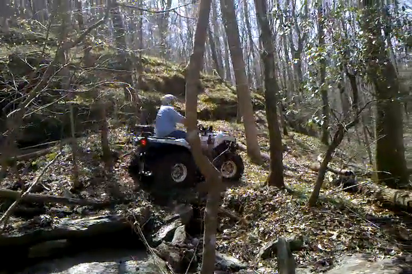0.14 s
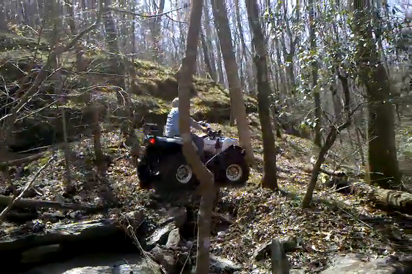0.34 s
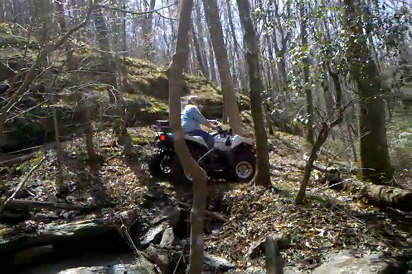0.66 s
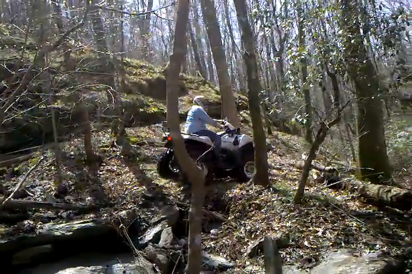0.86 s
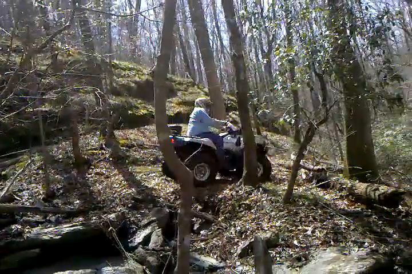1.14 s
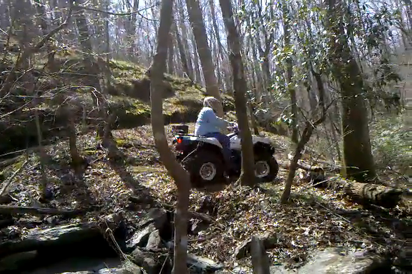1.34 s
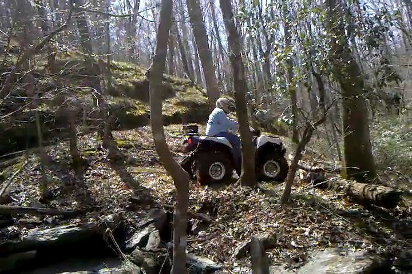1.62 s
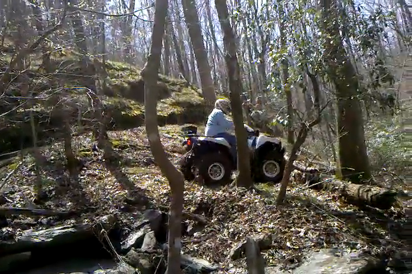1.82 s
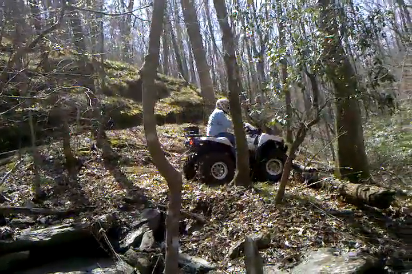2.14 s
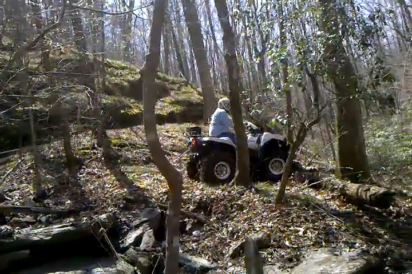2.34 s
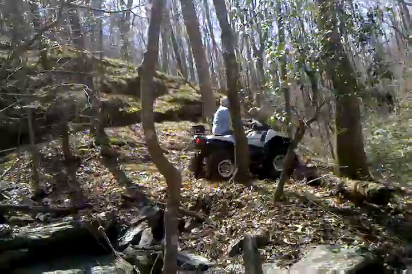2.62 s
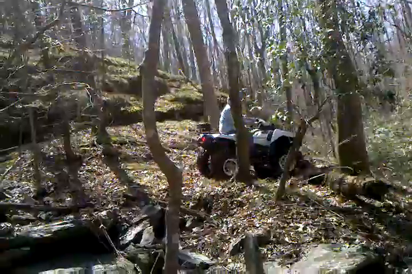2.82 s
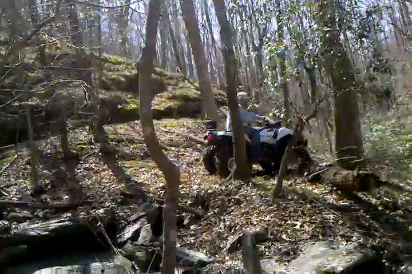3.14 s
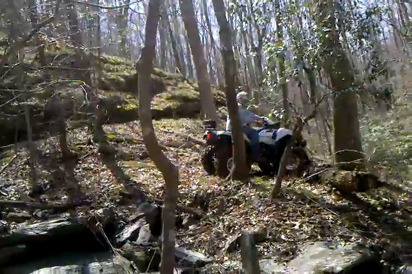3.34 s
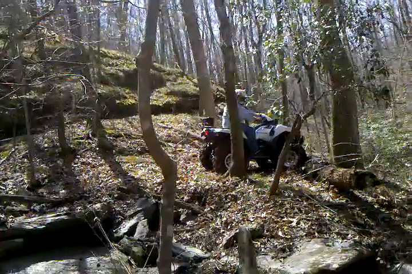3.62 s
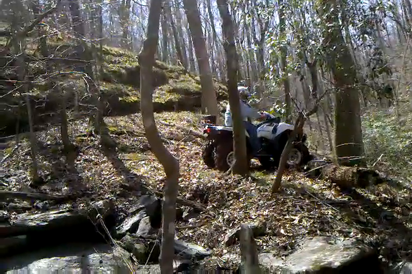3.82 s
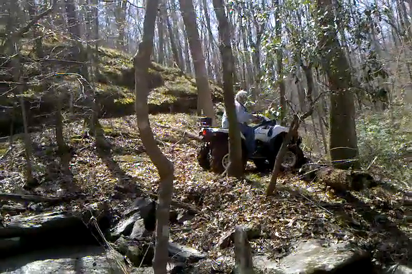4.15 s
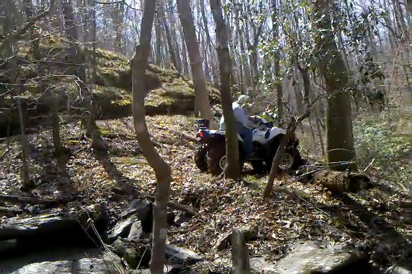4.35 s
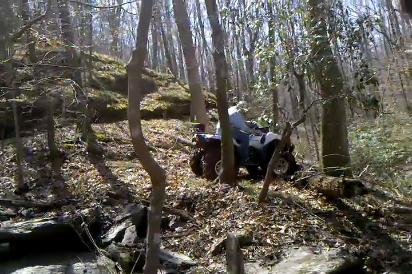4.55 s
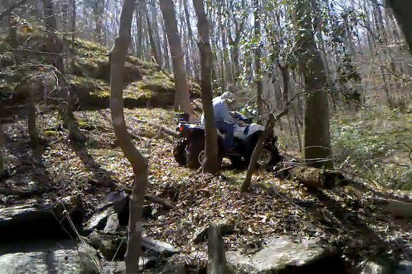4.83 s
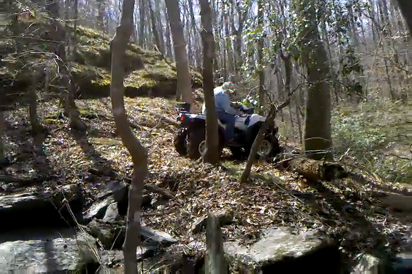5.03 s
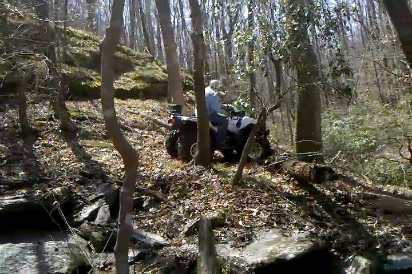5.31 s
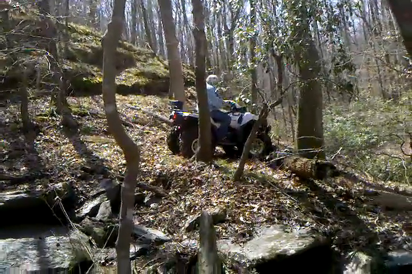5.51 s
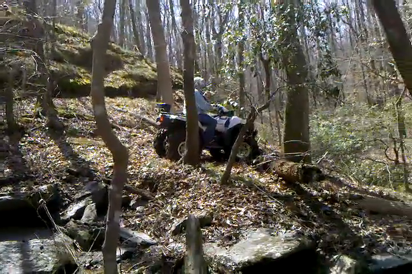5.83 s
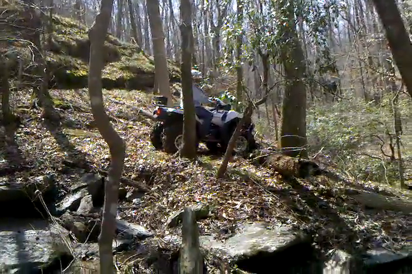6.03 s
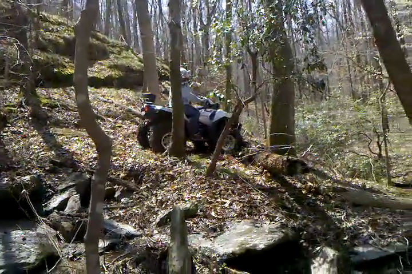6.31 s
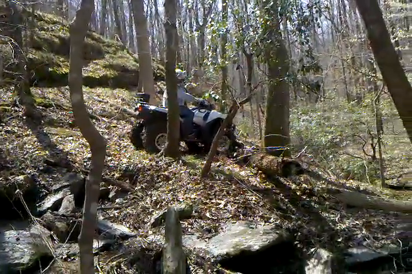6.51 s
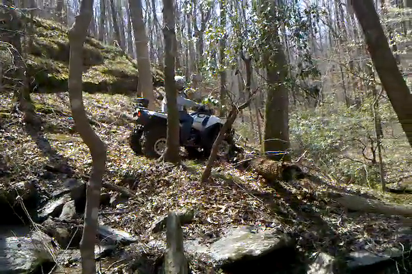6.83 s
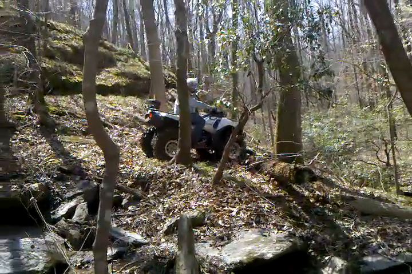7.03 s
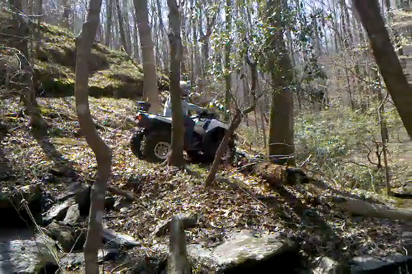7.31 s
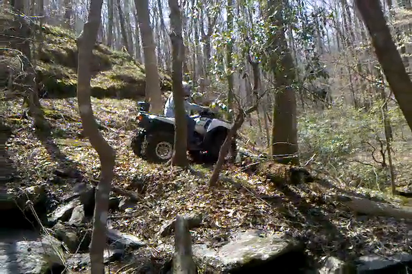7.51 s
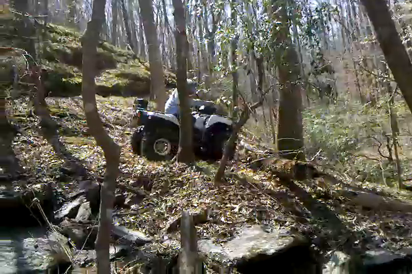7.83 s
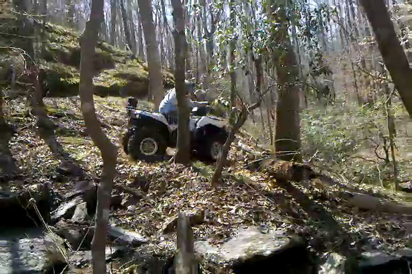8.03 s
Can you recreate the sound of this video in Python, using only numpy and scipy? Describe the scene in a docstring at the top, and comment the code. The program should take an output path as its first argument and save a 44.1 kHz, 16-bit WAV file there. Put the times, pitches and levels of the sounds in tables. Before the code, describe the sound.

Over the steady hiss of a small creek, a quad bike crawls at low speed with a booming putter, ticking valves and a whirring drive. It blips the throttle several times, idles while the gears clunk, and then revs more strongly as leaves crackle and swish beneath it. The trees add a short, light echo, and a small microphone some distance away dulls the highs.

```python
"""A single-cylinder quad bike crawls over rocks and dead leaves in a wood, some way from the microphone.
It putters in bursts of throttle, idles while the gears clunk, then revs up. Each firing booms in the
silencer and barks through the engine's metal and cavities; valves tick and the drive whirrs and whines.
Leaves swish and twigs snap under the tyres, and the trunks scatter the sound.
Behind it a small creek hisses over a faint low rumble. One small microphone, mono, with dull treble."""
import sys
import numpy as np
from scipy import signal
from scipy.fft import rfft, irfft, next_fast_len
from scipy.io import wavfile

SR = 44100
rng = np.random.default_rng(int(sys.argv[2]) if len(sys.argv) > 2 else 0)


def bounce(signal):
    """Save signal as a 16-bit WAV file at the path given by the first command-line argument."""
    frames = np.transpose(np.atleast_2d(signal))
    limited = np.clip(frames, -1, 1)
    pcm = np.round(limited * 32767).astype(np.int16)
    wavfile.write(sys.argv[1], SR, pcm)


N = 359856
TIME = np.arange(N) / SR
IDLE_PER_S, THROTTLE_PER_S = 11.499, 17.591  # firings at idle, and what full throttle adds

# silencer chambers, in series: f/Hz, width/Hz
SILENCER_CHAMBERS = [(150, 74.5), (181, 92)]
# rolling over the ground: t/s, clatter level at idle/dB, leaf level/dB (both relative)
ROLLING_LEVELS = [(0, -50, -56), (1.3, -52, -55.5), (2.0, -54, -56), (3.0, -51.5, -55), (3.6, -52.5, -52.5),
                  (4.0, -55, -59), (4.9, -52.5, -60.5), (5.4, -55, -54), (6.4, -53, -51.5),
                  (7.3, -52, -49.5), (7.8, -53, -55.5), (8.16, -49, -50)]


def from_db(db):
    """Decibels to gain."""
    return 10 ** (np.asarray(db) / 20)


def rms_one(x):
    """Scale to unit rms."""
    return x / np.sqrt(np.mean(x ** 2) + 1e-20)


def curve(rows):
    """Each column of a timed table, interpolated at every sample."""
    times, *columns = np.transpose(rows)
    return [np.interp(TIME, times, column) for column in columns]


def cut(x, hz, kind, order=2):
    """Butterworth filter."""
    return signal.sosfilt(signal.butter(order, hz, kind, fs=SR, output="sos"), x + 1e-18)


def resonator(hz, width_hz):
    """Filter coefficients of one resonance, gain 1 at its peak."""
    r = np.exp(-np.pi * width_hz / SR)
    return np.array([1, 0, -1]) * (1 - r * r) / 2, [1, -2 * r * np.cos(2 * np.pi * hz / SR), r * r]


def resonate(x, hz, width_hz):
    """Ring one fixed resonance."""
    return signal.lfilter(*resonator(hz, width_hz), x + 1e-18)


def colour(x, spectrum):
    """Give a steady sound a spectrum that falls away below its lowest point; rms 1."""
    hz, db = np.transpose(spectrum)
    size = next_fast_len(N)
    bins_hz = np.maximum(np.arange(size // 2 + 1) * SR / size, 1)
    gains = from_db(np.interp(np.log(bins_hz), np.log(hz), db))
    shaped = irfft(rfft(x, size) * gains, size)[:N]
    return rms_one(cut(shaped, hz[0], "high"))


def drift(per_s):
    """A random wander with a spread near 1."""
    knots = rng.standard_normal(4096)
    return np.interp(TIME * per_s, np.arange(len(knots)), knots)


def grains(per_s, spread_db):
    """Random clicks, mostly small and a few large; rms 1."""
    sizes = from_db(spread_db * np.minimum(rng.exponential(1, N), 4)) * rng.choice([-1, 1], N)
    return rms_one(sizes * (rng.random(N) < per_s / SR))


def clicks(times, sizes):
    """One click of the given size at each time."""
    at = np.round(times * SR).astype(int)
    inside = (at >= 0) & (at < N)
    return np.bincount(at[inside], sizes[inside], N)


def bursts(times, sizes, decay_s):
    """Noise that jumps up at each time and dies away."""
    envelope = signal.lfilter([1], [1, -np.exp(-1 / (decay_s * SR))], clicks(times, sizes) + 1e-18)
    return envelope * rng.standard_normal(N)


def lag(x, lag_s):
    """Follow a control with inertia, starting settled."""
    keep = np.exp(-1 / (lag_s * SR))
    return x[0] + signal.lfilter([1 - keep], [1, -keep], x - x[0])


def throttle(idle_puff_db=-28, charge_db=8, filling_opening=.19, idle_bark_db=-56, strain_db=6):
    """The intake fills and the flywheel follows; gives firings per s, puff level and bark level."""
    # presses of the thumb throttle: start t/s, end t/s, opening/0-1, relative bark level/dB
    presses = [(0, .015, .444, -45), (.084, .485, .131, -55), (.487, .787, .289, -47),
               (.793, 1.177, .227, -49), (1.267, 1.449, .146, -54), (1.622, 2.154, .082, -55),
               (2.156, 2.348, .376, -45), (2.445, 2.616, .439, -42), (2.754, 2.891, .572, -40),
               (3.009, 3.113, .19, -50), (3.477, 3.626, .47, -42), (6.063, 6.198, .75, -37),
               (6.285, 6.506, .572, -40), (6.547, 6.657, .525, -42), (6.708, 7.412, .761, -39),
               (7.461, 7.654, .73, -45), (7.695, 7.822, .78, -40), (7.824, 8.2, .995, -36)]
    opening, pressed_bark = np.zeros((2, N))
    for start, end, amount, db in presses:
        held = (TIME >= start) & (TIME < end)
        opening += amount * held
        pressed_bark += from_db(db) * held
    intake = lag(opening, lag_s=.0468)
    flywheel = lag(intake, lag_s=.0935)
    per_s = IDLE_PER_S + THROTTLE_PER_S * flywheel
    puff_db = idle_puff_db + charge_db * (1 - np.exp(-intake / filling_opening))
    bark_db = 20 * np.log10(from_db(idle_bark_db) + lag(pressed_bark, lag_s=.017))
    return per_s, puff_db, bark_db + strain_db * (intake - flywheel)


def firings(per_s):
    """Times at which the cylinder fires, and the length of each cycle in s."""
    cycles = np.cumsum(per_s) / SR - .546  # the first firing comes about half a cycle in
    fired = np.interp(np.arange(int(cycles[-1]) + 1), cycles, TIME)
    return fired, np.append(np.diff(fired), fired[-1] - fired[-2])


def exhaust(fired, period, per_s, puff_db, gain_db=19, uneven_db=0.65, flutter_db=-46, lead_s=0.00077):
    """Each firing is a blowdown puff and smaller puffs from the piston, booming in the silencer."""
    # gas pulses of one cycle: offset/cycles, relative strength, base width/s
    strokes = [(-.105, 0.007, 0.00089), (0, 1, 0.002), (0.097, 0.23, 0.00073), (.172, 0.33, 0.0015),
               (0.256, -0.077, 0.00099), (0.311, -0.0097, 0.0014)]
    # the tailpipe turns towards and away from the microphone: t/s, relative level/dB
    pipe_facing = [(0, -5.5), (.3, -1.5), (.95, 2.5), (2.85, 1.3), (3.1, -1), (3.7, 2.5), (5.3, 0),
                   (6.3, 1.5), (7.3, 0.3), (8.16, 1.5)]
    period = period[:, None]
    slowness = period / .06
    heard_db = puff_db + curve(pipe_facing)[0]
    strength = from_db(np.interp(fired, TIME, heard_db)[:, None])
    # the lesser puffs count for more under light load, and merge into the blowdown as the revs rise
    lesser = (strength / 0.044) ** -0.61 * np.minimum(slowness, 1) ** 4.4
    # each puff sits in a trough that scales with the cycle, so the bass thins as the revs rise
    draw_s = 0.031 * period
    # keeps the silencer's note strong however narrow the trough
    note_share = 1 - np.exp(-(2 * np.pi * SILENCER_CHAMBERS[0][0] * draw_s) ** 2 / 2)
    near_s = np.arange(-800, 801) / SR
    flow = np.zeros(N)
    for offset, size, width_s in strokes:
        uneven = from_db(uneven_db * rng.standard_normal(period.shape))
        sizes = size * strength * (lesser if offset else 1) * uneven / note_share
        puff_s = width_s * slowness ** 0.2  # puffs shorten with speed
        trough_s = np.hypot(puff_s, draw_s)
        puff = np.exp(-(near_s / puff_s) ** 2 / 2)
        trough = puff_s / trough_s * np.exp(-(near_s / trough_s) ** 2 / 2)
        times = fired[:, None] - lead_s + offset * period + near_s
        flow += clicks(times.ravel(), (sizes * (puff - trough)).ravel())
    # the gas keeps fluttering between puffs
    flow += from_db(flutter_db + heard_db / 2) * rms_one(cut(rng.standard_normal(N), 370, "low"))
    return from_db(gain_db) * cut(silencer(flow, per_s), 78.5, "high", order=6)


def silencer(flow, per_s, block=1024):
    """The chambers ring in series; hotter gas at higher revs raises their note."""
    pitch_ratio = 0.97 * (per_s / IDLE_PER_S) ** 0.15
    for hz, width_hz in SILENCER_CHAMBERS:
        state, out = np.zeros(2), np.zeros(N)
        for i in range(0, N, block):
            zeros, poles = resonator(hz * pitch_ratio[i], width_hz)
            out[i:i + block], state = signal.lfilter(zeros, poles, flow[i:i + block], zi=state)
        flow = out
    return flow


def bark(fired, period, bark_db, jet_db=17, snap_db=28, gulp_db=37.5):
    """A dull gulp, then a pressure snap and a jet of gas ring the engine, hardest under throttle."""
    strength = from_db(np.interp(fired, TIME, bark_db) + 0.72 * rng.standard_normal(len(fired)))
    opens = fired + .085 * period
    gulp = cut(clicks(fired - 0.071 * period, strength), 800, "low", order=3)
    snap = clicks(opens + .001, strength)
    jet = bursts(opens, strength, decay_s=0.0091)
    ringing = engine_body(from_db(jet_db) * jet + from_db(snap_db) * snap + from_db(gulp_db) * gulp)
    return cut(ringing, 230, "high", order=3)  # the small openings radiate little bass


def engine_body(x):
    """The metal and air cavities of the engine ring side by side."""
    # modes of pipe, airbox and engine case: f/Hz, width/Hz, level/dB
    modes = [(303, 31, -1.5), (371.5, 26, -1), (516, 75, -1), (623, 102, 2), (781, 113, -0.5),
             (1000, 130, -3), (1147, 140, -3.5), (1435, 160, -4), (1694, 61, -1), (2160, 180, -8),
             (2680, 190, -11.5), (2990, 120, -7), (3630, 270, -10.5), (4470, 330, -15), (5850, 890, -15.5)]
    return sum((-1) ** k * from_db(db) * resonate(x, hz, width_hz)
               for k, (hz, width_hz, db) in enumerate(modes))


def clatter(fired, period, per_s, whirr_db=-1.5, tick_db=-6, db_per_octave=4.5):
    """Chain and drive whirr and the valves tick three times a cycle, all louder as the revs rise."""
    # spectrum of the whirr: f/Hz, relative level/dB
    spectrum = [(160, -32.5), (280, -8), (308, -2), (449, -5), (579, 2), (822, -9), (892, -6.5), (1680, -3),
                (1970, -10.5), (2230, -10), (3290, -14), (4430, -16.5), (7000, -25), (9100, -49.5),
                (15400, -120)]
    level = from_db(curve(ROLLING_LEVELS)[0] + db_per_octave * np.log2(per_s / IDLE_PER_S))
    seatings = np.concatenate([fired + share * period for share in (.14, .36, .64)])
    ticks = bursts(seatings, from_db(3.5 * rng.standard_normal(len(seatings))), decay_s=0.0038)
    whirr = colour(grains(per_s=5000, spread_db=2.2), spectrum) * from_db(2.0 * drift(per_s=45))
    return level * (from_db(whirr_db) * whirr + from_db(tick_db) * rms_one(engine_body(ticks)))


def gear_whine():
    """The drive gears sing unsteadily while they pull."""
    # swells of the whine: t/s, level/dB
    swells = [(0, -51.5), (.4, -62.5), (.6, -58), (.8, -54.5), (1.2, -57.5), (1.5, -67), (2.5, -70),
              (2.9, -53), (3.3, -71), (8.16, -72.5)]
    # gear tones: f/Hz, width/Hz, relative level/dB
    tones = [(2183, 92, -4.5), (2560, 110, -8.5)]
    singing = np.zeros(N)
    for hz, width_hz, db in tones:
        band = resonate(rng.standard_normal(N), hz, width_hz)
        singing += from_db(db) * rms_one(resonate(band, hz, width_hz))
    return from_db(curve(swells)[0]) * singing


def leaves(roll_db=3.5, swish_db=7):
    """Dry leaves crackle under the rolling tyres and swish where a wheel pushes through."""
    # wheels pushing through leaves: t/s, relative level/dB, half length/s
    swishes = [(2.901, -57, .07), (3.016, -54.5, 0.062), (3.202, -46.5, 0.026), (3.582, -48.5, 0.038),
               (5.229, -53.5, 0.082), (5.811, -45.5, 0.039), (6.478, -43.5, 0.041), (7.211, -39, 0.032),
               (7.321, -45.5, 0.027), (7.954, -41, 0.035), (8.082, -45, 0.045)]
    # spectrum of the crackle: f/Hz, relative level/dB
    spectrum = [(400, -14.5), (1000, -5.5), (2000, -4.5), (3500, -2), (5000, -1), (6600, -0.5), (8000, 1.5)]
    rolling = from_db(roll_db + curve(ROLLING_LEVELS)[1])
    swish = sum(from_db(swish_db + db) * np.exp(-np.minimum(((TIME - t) / half_s) ** 2 / 2, 20))
                for t, db, half_s in swishes)
    crackle = colour(grains(per_s=5000, spread_db=2.5), spectrum)
    return np.hypot(rolling, swish) * crackle * from_db(2.1 * drift(per_s=60))


def creek():
    """A small creek in the background: dense tiny clicks blend into a steady hiss."""
    # spectrum of the water: f/Hz, relative level/dB
    spectrum = [(160, -29.5), (280, -6.5), (425, 0.5), (595, 1.5), (892, -1), (1140, 3), (1270, -3),
                (1700, -3), (1920, -3.5), (6040, -8), (7000, -25.5), (9100, -50), (15400, -120)]
    return from_db(-53.5) * colour(grains(per_s=12000, spread_db=1.6), spectrum)


def rumble():
    """A faint, low outdoor rumble."""
    return from_db(-66) * rms_one(cut(rng.standard_normal(N), [60, 140], "band"))


def rock_echoes(x):
    """The direct sound and its distinct echoes off the slope and rocks."""
    # reflections: delay t/s, relative strength
    reflections = [(0.0189, 0.14), (0.0249, 0.13), (0.031, .05), (0.043, -0.15)]
    # the echoes grow as the quad nears the rocks and a fallen log: t/s, relative level/dB
    nearness = [(0, -0.5), (1.9, -11.5), (2.4, 1), (4, 2.5), (8.16, 0)]
    echoes = sum(gain * np.interp(TIME - delay_s, TIME, x, left=0) for delay_s, gain in reflections)
    return x + from_db(curve(nearness)[0]) * echoes


def trunk_scatter(x, wet_db, t60_s=0.43, build_s=0.014):
    """The direct sound and the many faint, dying echoes that the trunks throw back."""
    age = TIME[:SR]
    echoes = rng.standard_normal(SR) * (rng.random(SR) < .05)
    envelope = from_db(-60 * age / t60_s) * (1 - np.exp(-age / build_s))
    scatter = cut(echoes * envelope, 7100, "low", order=1)
    scatter /= np.sqrt(np.sum(scatter ** 2))
    return x + from_db(wet_db) * signal.oaconvolve(x, scatter)[:N]


def knocks(thud_db=3, clack_db=0.5, crack_db=0):
    """Each knock is a short rattle of contacts with a thud, a clack and a bright crack."""
    # knocks of the engine, gears, frame and twigs: t/s, relative thud, clack and crack level/dB, t60/s
    hits = [(0.39, -47.5, -47, -46.5, 0.16), (0.95, -45, -49, -49.5, 0.068), (1.852, -48, -56, -43.5, 0.14),
            (2.759, -48, -40, -57, 0.065), (2.812, -50, -44.5, -40, 0.083), (3.004, -52, -53, -38, 0.04),
            (3.354, -36.5, -42, -59, 0.08), (3.367, -53, -34, -46, 0.055), (3.481, -53, -45, -41, 0.084),
            (3.395, -53, -46.5, -53, 0.24), (4.644, -46, -51, -54, 0.098), (4.75, -47.5, -43, -43, 0.15),
            (4.803, -45, -39.5, -42, 0.098), (4.815, -42, -51, -48.5, 0.12), (4.87, -57, -53, -48, 0.07),
            (4.916, -48, -60, -42.5, 0.065), (4.985, -42, -48, -44.5, 0.11),
            (5.12, -47, -49.5, -45.5, 0.12), (5.17, -50, -39.5, -45.5, 0.11)]
    bands = [(420, 1000, thud_db), (1000, 2100, clack_db), (2500, 7500, crack_db)]
    age = TIME[:SR // 2]
    out = np.zeros(N)
    for k, (low_hz, high_hz, band_db) in enumerate(bands):
        envelope = np.zeros(N + len(age))
        for t, *levels_db, t60_s in hits:
            at = int(t * SR)
            envelope[at:at + len(age)] += from_db(levels_db[k] + band_db - 60 * age / t60_s)
        rattle = envelope[:N] * grains(per_s=12000, spread_db=0.95)
        band_share = 2 * (high_hz - low_hz) / SR
        out += cut(rattle, [low_hz, high_hz], "band") / np.sqrt(band_share)
    return out


def scene():
    """The quad bike some way off among the trees, over the creek and the rumble."""
    per_s, puff_db, bark_db = throttle()
    fired, period = firings(per_s)
    boom = rock_echoes(exhaust(fired, period, per_s, puff_db))
    boom = trunk_scatter(boom, wet_db=-25)
    engine = bark(fired, period, bark_db) + clatter(fired, period, per_s) + gear_whine()
    ground = leaves() + knocks()
    background = creek() + rumble()
    return (boom + trunk_scatter(engine + ground, wet_db=-14.5) + background)[None]


def record(dry, cutoff_hz=7000):
    """A small microphone with a steep treble cut."""
    return signal.sosfilt(signal.ellip(8, .3, 80, cutoff_hz, fs=SR, output="sos"), dry)


dry = scene()
out = record(dry)
bounce(out)
```